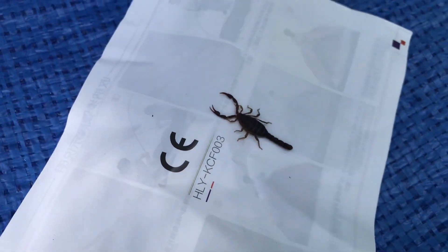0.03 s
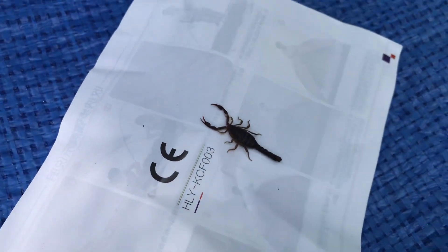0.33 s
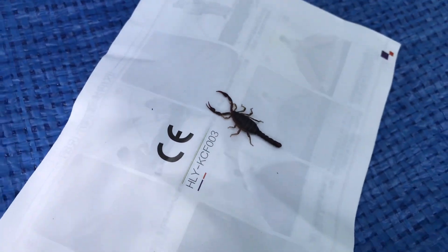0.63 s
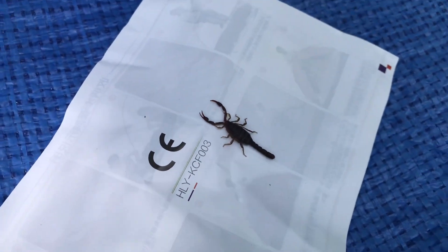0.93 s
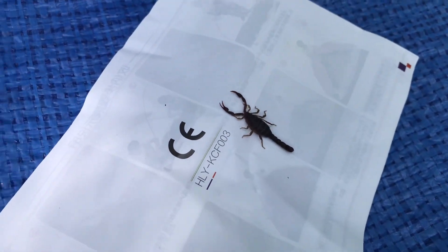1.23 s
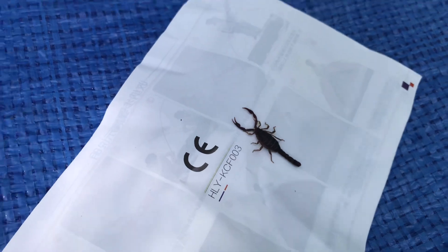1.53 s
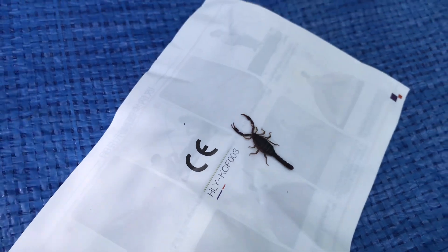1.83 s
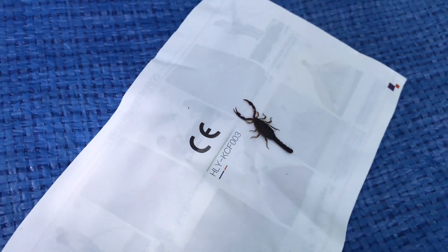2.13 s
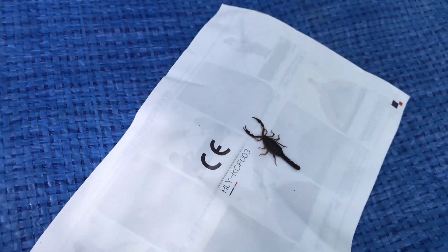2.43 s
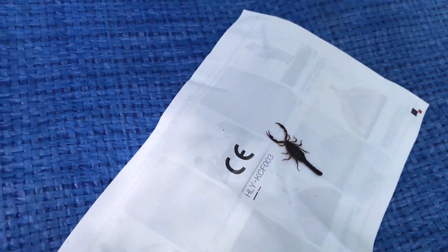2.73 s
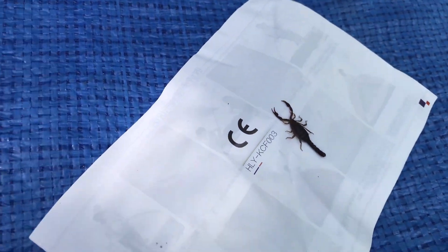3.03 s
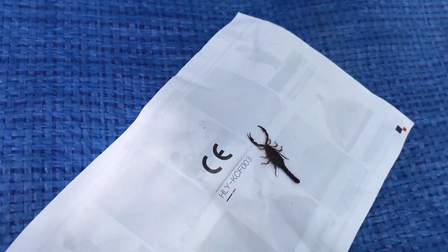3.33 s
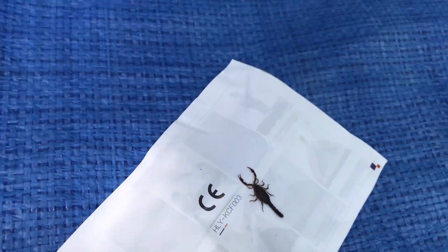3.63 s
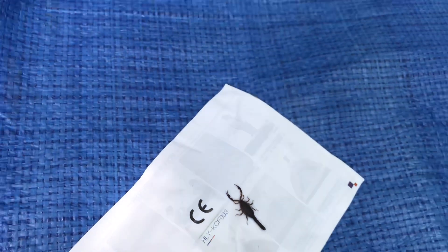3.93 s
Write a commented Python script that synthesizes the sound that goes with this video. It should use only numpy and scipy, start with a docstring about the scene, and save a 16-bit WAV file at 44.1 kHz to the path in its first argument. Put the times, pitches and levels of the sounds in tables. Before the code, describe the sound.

A thin plastic pouch rustles and crackles under a hand, with faint birds outdoors.

```python
"""Outdoors, close to the microphone, a hand shifts a thin plastic pouch: two light rubs, then a firm drag.
The friction is a stream of tiny stick-slip clicks, with small facets of the film ringing as they flip.
Creases buckle with a snap, the hand adds soft bumps, and the film sings briefly as it slides; one short
squeak sits in the second rub. Far off, motors drone, a bird whistles and insects hiss."""
import sys
import numpy as np
from scipy import signal
from scipy.fft import rfft, irfft
from scipy.io import wavfile
from scipy.ndimage import uniform_filter1d

SR = 44100
rng = np.random.default_rng(int(sys.argv[2]) if len(sys.argv) > 2 else 0)


def wav_out(sig):
    """Save sig, one row per channel (or a flat mono array), as 16-bit PCM at SR to the path in sys.argv[1]."""
    wavfile.write(sys.argv[1], SR, np.round(np.clip(np.atleast_2d(sig).T, -1, 1) * 32767).astype(np.int16))


N = 176400
T, HZ = np.arange(N) / SR, np.fft.rfftfreq(N, 1 / SR)

# Tone of the outdoor air bed: f/Hz, relative level/dB
AIR_EQ = [(25, -25), (48, 3), (90, -1), (135, -7), (250, -6), (400, -9.5), (470, -16.5), (750, -22.5),
          (1300, -25), (2000, -29), (3800, -29), (5500, -34), (9000, -35.5), (15500, -37.5)]
# Partials of the far engine: starting f/Hz, level/dB before the fader
ENGINE_PARTIALS = [(52.5, -81.5), (105, -63), (157, -63.5), (209, -71), (314, -77)]
# Fader ride on the engine: t/s, gain/dB
ENGINE_FADER = [(0, 3), (1.2, 2.5), (2.3, 3), (2.7, -1.5), (4, 5.5)]
# Thin bird and insect trills: start t/s, end t/s, f/Hz, width/Hz, level/dB before the throb
TRILL_BANDS = [(-.05, 0.09, 2640, 220, -77), (.32, 0.48, 2660, 220, -80), (.45, 0.62, 2980, 220, -79.5),
               (.16, 3.1, 5900, 380, -82.5)]
# Swell of a high insect buzz: t/s, level/dB
BUZZ_FADER = [(1.45, -86), (1.5, -75), (1.85, -79), (2.1, -86)]
# Bird whistles: t/s, length/s, f/Hz at both ends, top f/Hz, place of the top (0-1), level/dB
BIRD_NOTES = [(.05, .25, 2990, 3080, .4, -77.5), (0.532, 0.14, 3440, 4850, 0.68, -73),
              (0.748, .05, 3470, 3810, 0.65, -79), (.853, 0.044, 3790, 5180, 0.68, -72),
              (0.927, .025, 4800, 5170, 0.4, -73), (2.543, .145, 3490, 4870, .68, -74),
              (2.79, .09, 3660, 3780, .3, -80.5)]
# Glide of the squeak: t/s, f/Hz, level/dB before its resonances
SQUEAK_GLIDE = [(2.002, 402, -68), (2.02, 703, -60), (2.029, 886, -56), (2.038, 938, -53), (2.05, 793, -63),
                (2.065, 702, -64), (2.08, 655, -69)]
# Resonances of the squeak: f/Hz, gain/dB
SQUEAK_EQ = [(500, -8), (800, 0), (1100, -19), (1400, 0.5), (1850, 1), (2200, -22), (2700, -6.5),
             (3100, -16), (3600, -5), (4500, -20)]
# Soft hand bumps: t/s, envelope peak level/dB, f/Hz
HAND_BUMPS = [(1.18, -37.5, 193), (1.204, -44, 127), (2.147, -41, 102), (2.193, -41, 93),
              (3.275, -35, 92.5), (3.351, -35.5, 133), (3.633, -34, 106), (3.8, -27, 67.4),
              (3.803, -29, 214), (3.82, -25.5, 162), (3.922, -34, 72)]
# Spots where the film sings: t/s, rise/s, fall/s, f/Hz, level/dB
FILM_NOTES = [(3.63, .007, .014, 3020, -47), (3.712, .012, .022, 3000, -47)]
# Crease snaps: t/s, peak level/dB, centre f/Hz, width/octaves, decay/s
CREASE_SNAPS = [(.537, -48, 6500, 0.35, .001), (0.9482, -40, 1570, 0.84, 0.001),
                (0.9665, -38, 1150, 0.34, 0.0026), (1.0509, -31.5, 2400, 2.4, 0.0013),
                (1.081, -44, 1520, 0.47, 0.004), (1.15, -38, 2340, 1.5, 0.0069),
                (1.1801, -44, 930, 0.62, 0.0037), (1.203, -43, 2210, 1.6, 0.0067),
                (1.2123, -34, 1140, 1.2, 0.002), (1.391, -43.5, 1960, .6, 0.002),
                (1.535, -50, 2420, 1.4, 0.0034), (1.682, -45.5, 1410, 1.6, 0.0036),
                (1.6909, -38.5, 2410, 1.2, 0.0033), (1.6963, -36.5, 950, 1.24, 0.0023),
                (1.738, -49, 2200, 0.9, 0.0025), (1.7915, -43.5, 3800, 0.86, 0.003),
                (1.9031, -44.5, 11040, 0.1, 0.0014), (1.903, -38, 3600, 1.2, 0.0018),
                (2.1875, -41, 6500, 0.63, 0.0023), (2.304, -39, 1420, .7, 0.004),
                (2.311, -48, 1550, 0.27, 0.0028), (2.335, -43, 4460, 0.7, 0.0022),
                (2.94, -41, 13700, 0.39, .001), (3.112, -49, 2440, 3.5, 0.0034),
                (3.176, -34, 3020, 0.73, 0.0024), (3.2037, -24, 2000, 0.82, 0.0019),
                (3.3506, -23.5, 1850, 0.4, 0.0016), (3.355, -26.5, 1720, 0.44, 0.0018),
                (3.3803, -26.5, 2200, 0.59, 0.00069), (3.4187, -24, 2300, 1, 0.00084),
                (3.477, -25.5, 3280, 0.41, 0.00075), (3.5541, -21, 2390, 0.62, 0.0015),
                (3.575, -24.5, 1260, 0.91, 0.0012), (3.721, -22.5, 1480, 0.95, 0.0014),
                (3.727, -26, 2220, 2, 0.0018), (3.7847, -25, 2000, 1.13, 0.0023),
                (3.812, -29, 1090, 0.52, 0.0057), (3.85, -16.5, 3300, 1.17, 0.0012)]
# Range in which the facets of the film ring: lowest f/Hz, highest f/Hz
FACET_RANGE = (677, 6980)
# Strokes of the light rubs, before trim: t/s, rise/s, fall/s, scrape level/dB, fizz level/dB,
# scrape tilt/(dB per octave)
RUB_STROKES = [(0.953, 0.0062, 0.064, -52, -65, -2.5), (1.0, 0.041, 0.027, -60.5, -66, -4.5),
               (1.051, 0.02, 0.061, -56.5, -67, -2), (1.123, 0.022, 0.026, -54.5, -60, 1),
               (1.185, 0.02, 0.018, -55.5, -60.5, -1.5), (1.235, 0.016, 0.018, -57.5, -66.5, 1.5),
               (1.31, 0.051, 0.057, -60, -65.5, 1.5), (1.675, 0.013, 0.0074, -51, -69, -2),
               (1.774, 0.01, 0.043, -65.5, -69, 1), (1.987, 0.034, 0.043, -59, -62, -1),
               (2.086, 0.079, 0.0064, -57, -53, 3.5), (2.162, 0.025, 0.048, -55, -60.5, 1),
               (2.25, 0.066, 0.074, -61.5, -68.5, 0)]
# Surges of the drag, before trim: t/s, rise/s, fall/s, scrape level/dB, fizz level/dB, rumble level/dB
DRAG_SURGES = [(3.111, 0.002, 0.055, -52.5, -56.5, -54), (3.142, 0.035, 0.023, -51, -47, -52),
               (3.179, 0.019, 0.6, -48.5, -51, -49), (3.284, 0.048, 0.11, -48.5, -46, -42.5),
               (3.38, 0.089, 0.11, -51, -47.5, -56), (3.488, 0.06, 0.047, -43.5, -46.5, -50.5),
               (3.585, 0.073, 0.11, -48.5, -48, -49.5), (3.702, 0.045, 0.088, -44, -46, -41.5),
               (3.746, 0.067, 0.06, -41.5, -43.5, -36.5), (3.81, 0.044, 0.1, -46.5, -45.5, -48),
               (3.88, 0.043, 0.4, -53, -51.5, -59)]
# Tone of each friction layer: f/Hz, relative level/dB
RUB_SCRAPE_EQ = [(150, 1.5), (400, 0.5), (600, -4), (1100, -3), (1900, -5), (2800, -8), (4000, -6),
                 (6000, -18), (9000, -56)]
RUB_FIZZ_EQ = [(3000, -13), (6500, 10.5), (8500, 8.5), (11500, 8.5), (13500, 8), (15500, 6.5)]
DRAG_SCRAPE_EQ = [(200, -8), (450, -2), (750, -1), (1100, -6.5), (1900, 3.5), (2700, -2), (3800, 1.5),
                  (6000, -8), (9000, -41)]
DRAG_FIZZ_EQ = [(3000, -8.5), (6500, -4), (8500, -4.5), (11500, -5.5), (13500, -6.5), (15500, -7)]
PRESSED_EQ = [(300, -5), (550, 1.5), (850, -1), (1200, 7.5), (1700, -16), (3000, -46)]  # body that the scrape gains under pressure
RUMBLE_EQ = [(20, -37), (45, -1), (70, 1), (110, -0.5), (170, 0), (290, -1.5), (450, -13), (900, -27),
             (2000, -69)]  # low end carried through the hand
# Dips that colour the microphone: f/Hz, width/Hz, gain/dB
MIC_DIPS = [(4920, 350, -3), (7650, 980, -2.5), (10400, 1200, -4)]


def amp(db):
    """Decibels to gain."""
    return 10 ** (np.asarray(db) / 20)


def unit(x):
    """Scales to rms 1."""
    return x / np.sqrt(np.mean(x ** 2) + 1e-20)


def add(mix, start_s, sound):
    """Drops a sound into the mix at its cue."""
    part = mix[max(round(start_s * SR), 0):][:len(sound)]
    part += sound[:len(part)]


def colour(x, eq):
    """Runs a signal through an EQ curve and sets it to rms 1."""
    hz, db = np.transpose(eq)
    gain = amp(np.interp(np.log(HZ + 1), np.log(hz), db))
    return unit(irfft(rfft(x) * gain, N))


def band(hz, width_hz):
    """Noise in one bell-shaped band; at 0 Hz, a slow wander."""
    bell = np.exp(-2 * ((HZ - hz) / width_hz) ** 2)
    return unit(irfft(rfft(rng.standard_normal(N)) * bell, N))


def fader(times, db, edge_s=0.0099):
    """Gain along a level curve, fading to silence outside it."""
    gate = np.clip(np.minimum(T - times[0], times[-1] - T) / edge_s + 1, 0, 1)
    return amp(np.interp(T, times, db)) * gate


def air(db=-59):
    """A soft, dark bed of outdoor air."""
    return amp(db) * colour(rng.standard_normal(N), AIR_EQ)


def engine(speedup_per_s=0.008, waver=0.0098, flutter=0.33):
    """A far engine creeps up in speed; its partials waver together and flutter separately."""
    running_s = np.cumsum(1 + speedup_per_s * T + waver * band(0, 12.6)) / SR
    drone = np.zeros(N)
    for hz, db in ENGINE_PARTIALS:
        tremor = 1 + flutter * band(0, 31)
        drone += amp(db) * unit(tremor * np.sin(2 * np.pi * (hz * running_s + rng.random())))
    return drone * fader(*np.transpose(ENGINE_FADER))


def motor_hum(start_hz=409, start_db=-69.5, sag_hz_per_s=7, fade_db_per_s=2):
    """A second far motor recedes: one unsteady tone that sinks and fades."""
    hz = start_hz - sag_hz_per_s * T + 2 * band(0, 17.3)
    return amp(start_db - fade_db_per_s * T) * unit(np.sin(2 * np.pi * np.cumsum(hz) / SR))


def trills(throb_db=4.2, fade_s=0.02):
    """Far birds and insects: narrow bands of throbbing noise."""
    out = np.zeros(N)
    for start_s, end_s, hz, width_hz, db in TRILL_BANDS:
        gate = np.clip(np.minimum(T - start_s, end_s - T) / fade_s, 0, 1)
        out += amp(db) * band(hz, width_hz) * gate
    return out * amp(throb_db * band(0, 23))


def insect_buzz():
    """One insect's high hiss swells and fades."""
    return band(hz=12100, width_hz=1150) * fader(*np.transpose(BUZZ_FADER))


def whistle(length_s, end_hz, top_hz, top_at, db):
    """An unsteady note whose pitch and strength rise and fall in one arch."""
    progress = np.arange(0, length_s, 1 / SR) / length_s
    arch = abs(np.sin(np.pi * np.interp(progress, [0, top_at, 1], [0, .5, 1])))
    wobble = unit(uniform_filter1d(rng.standard_normal((2, SR // 2)), size=90))
    shake, jitter = wobble[:, :len(progress)]
    hz = (end_hz + (top_hz - end_hz) * arch ** .6) * (1 + .012 * jitter)
    tone = np.sin(2 * np.pi * np.cumsum(hz) / SR)
    return amp(db) * unit(arch ** .15 * tone * (1 + .45 * shake))


def bird(echo_db=-8, echo_s=0.08):
    """Far whistles with a diffuse outdoor echo."""
    out, t = np.zeros(N), T[:SR // 2]
    for start_s, *note in BIRD_NOTES:
        add(out, start_s, whistle(*note))
    tail = rng.standard_normal(len(t)) * np.exp(-t / echo_s)
    return out + amp(echo_db) * signal.fftconvolve(out, tail / np.linalg.norm(tail))[:N]


def squeak(roughness=.3):
    """One quick arched glide whose harmonics sweep through steady resonances."""
    times, pitch, db = np.transpose(SQUEAK_GLIDE)
    hz = np.interp(T, times, pitch)
    phase = 2 * np.pi * np.cumsum(hz) / SR
    tone = sum(amp(np.interp(k * hz, *np.transpose(SQUEAK_EQ))) * np.sin(k * phase) for k in range(1, 6))
    return tone * fader(times, db) * (1 + roughness * band(0, 300))


def bumps(cycles=.6):
    """Low pushes of the hand that die within a couple of cycles."""
    out, t = np.zeros(N), T[:SR // 8]
    for start_s, db, hz in HAND_BUMPS:
        age = 2 * t * hz / cycles
        envelope = age * np.exp(1 - age)
        add(out, start_s, -amp(db) * envelope * np.sin(2 * np.pi * hz * t))
    return out


def stroke(start_s, rise_s, fall_s, onset_db=-14, release_db=-7):
    """Envelope of one slide: it catches, swells, then is down to release_db after fall_s."""
    t = T - start_s
    swell_db = onset_db * (1 - np.maximum(t, 0) / rise_s) ** 2
    fade_db = release_db * (abs(t - rise_s) / fall_s) ** 1.63
    db = np.where(t < rise_s, swell_db, fade_db)
    return amp(np.maximum(db, -120)) * np.clip(t / 0.001, 0, 1)


def singing_film(width_hz=310):
    """The sliding film sings in brief, narrow bands of noise."""
    return sum(amp(db) * stroke(*timing) * band(hz, width_hz) for *timing, hz, db in FILM_NOTES)


def snaps(crack=10, soften_s=0.0038, tail_db=-22, tail_s=0.026, skirt=0.8):
    """A crease buckles: one sharp click, a burst of smaller ones and a faint tail."""
    out, t, hz = np.zeros(N), T[:2048], np.fft.rfftfreq(2048, 1 / SR)
    for start_s, db, centre_hz, octaves, decay_s in CREASE_SNAPS:
        envelope = np.exp(-t / decay_s) + amp(tail_db) * np.exp(-t / tail_s)
        burst = rng.standard_normal(len(t)) * envelope
        burst[0] = crack * np.exp(-decay_s / soften_s)  # slow buckles start softly
        detune = np.log2((hz + 30) / centre_hz) / octaves
        log_gain = -skirt * np.log(1 + detune ** 2 / skirt)
        mirrored = np.r_[log_gain, log_gain[-2:0:-1]]
        resonance = np.exp(np.conj(signal.hilbert(mirrored)))[:len(hz)]  # minimum phase: crisp attack
        snap = irfft(rfft(burst) * resonance)
        add(out, start_s, amp(db) * snap / abs(snap).max())
    return out


def slips(per_s, spread_db, clump_db, clump_hz):
    """Tiny stick-slip clicks of uneven size that come in clumps."""
    size = amp(spread_db * np.minimum(rng.exponential(1, N), 4) + clump_db * band(0, clump_hz))
    return size * rng.choice([-1, 1], N) * (rng.random(N) < per_s / SR)


def crinkles(per_s, cycles, spread_db, tilt_db, facets=18):
    """Small facets of the film flip, each ringing briefly at its own pitch; tilt is per octave."""
    out, t = np.zeros(N), T[:600]
    for hz in np.geomspace(*FACET_RANGE, facets):
        size = amp(spread_db * np.minimum(rng.exponential(1, N), 3))
        flips = size * (rng.random(N) < per_s / facets / SR)
        age = t * hz / cycles
        ring = unit(np.sqrt(age) * np.exp(-age) * np.sin(2 * np.pi * hz * t))
        out += amp(tilt_db * np.log2(hz)) * signal.oaconvolve(flips, ring)[:N]
    return unit(out)


def moving_contact(friction, depth_db=2.0):
    """The contact keeps moving over the film, so bands of the friction flare and fade."""
    bands = signal.stft(friction, nperseg=256)[2]
    patches = uniform_filter1d(rng.standard_normal(bands.shape), size=7, axis=0)  # across frequency
    patches = unit(uniform_filter1d(patches, size=8, axis=1))  # across time
    return unit(signal.istft(bands * amp(depth_db * patches), nperseg=256)[1][:N])


def rubs(scrape_trim_db=-1, fizz_trim_db=0.5, crinkle_db=-7.5):
    """Fingers slide lightly on the film: grainy scrape and crinkles under a fine fizz."""
    scrape = colour(slips(per_s=4000, spread_db=3.0, clump_db=2.0, clump_hz=143), RUB_SCRAPE_EQ)
    scrape += amp(crinkle_db) * crinkles(per_s=730, cycles=2.2, spread_db=6.5, tilt_db=-1.5)
    fizz = colour(slips(per_s=28000, spread_db=4.0, clump_db=2.0, clump_hz=119), RUB_FIZZ_EQ)
    spectrum, octaves = rfft(scrape), np.log2(np.clip(HZ, 1000, 6000))
    out = np.zeros(N)
    for *timing, scrape_db, fizz_db, tilt_db in RUB_STROKES:
        tilted = unit(irfft(spectrum * amp(tilt_db * octaves), N))  # duller or brighter per stroke
        texture = amp(scrape_db + scrape_trim_db) * tilted + amp(fizz_db + fizz_trim_db) * fizz
        out += stroke(*timing) * texture
    return out


def drag(scrape_trim_db=-2, fizz_trim_db=-0.5, rumble_trim_db=-1, crinkle_db=-7, body_db=-9.5):
    """A firm slide in surges: denser friction, fuller when pressed, with rumble through the hand."""
    surges = [amp(row[3:])[:, None] * stroke(*row[:3]) for row in DRAG_SURGES]
    scrape_gain, fizz_gain, rumble_gain = np.sqrt(sum(surge ** 2 for surge in surges))
    pressure = scrape_gain / amp(-45)  # the body's share is body_db on a -45 dB surge
    friction = slips(per_s=9800, spread_db=1.5, clump_db=2.0, clump_hz=153)
    scrape = moving_contact(colour(friction, DRAG_SCRAPE_EQ))
    scrape += amp(body_db) * pressure * colour(friction, PRESSED_EQ)
    scrape += amp(crinkle_db) * crinkles(per_s=600, cycles=2.1, spread_db=2.5, tilt_db=2.0)
    fine_friction = slips(per_s=26000, spread_db=1.0, clump_db=0.3, clump_hz=98)
    fizz = moving_contact(colour(fine_friction, DRAG_FIZZ_EQ))
    rumble = colour(rng.standard_normal(N), RUMBLE_EQ)
    return (amp(scrape_trim_db) * scrape_gain * scrape
            + amp(fizz_trim_db) * fizz_gain * fizz
            + amp(rumble_trim_db) * rumble_gain * rumble)


def scene():
    """Mono mix: the pouch up front, the outdoors behind."""
    pouch = rubs() + drag() + singing_film() + snaps() + bumps() + squeak()
    outdoors = engine() + motor_hum() + trills() + insect_buzz() + air() + bird()
    return (pouch + outdoors)[None]


def record(dry, low_cut_hz=32, high_cut_hz=15900):
    """Microphone colour: treble dips, a low cut and a steep high cut."""
    dips_db = sum(db * np.exp(-2 * ((HZ - hz) / width) ** 2) for hz, width, db in MIC_DIPS)
    heard = irfft(rfft(dry) * amp(dips_db), N)
    heard = signal.sosfilt(signal.butter(2, low_cut_hz, "highpass", fs=SR, output="sos"), heard)
    high_cut = signal.firwin(511, high_cut_hz, window=("kaiser", 9), fs=SR)
    return signal.oaconvolve(heard, high_cut[None], "same")


dry = scene()
out = record(dry)
wav_out(out)
```